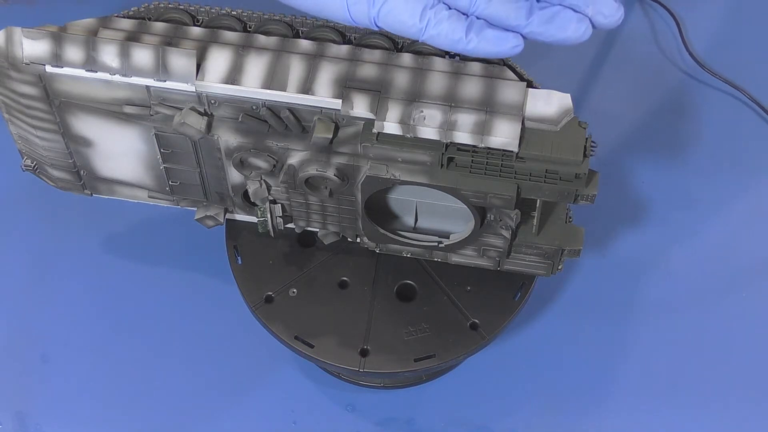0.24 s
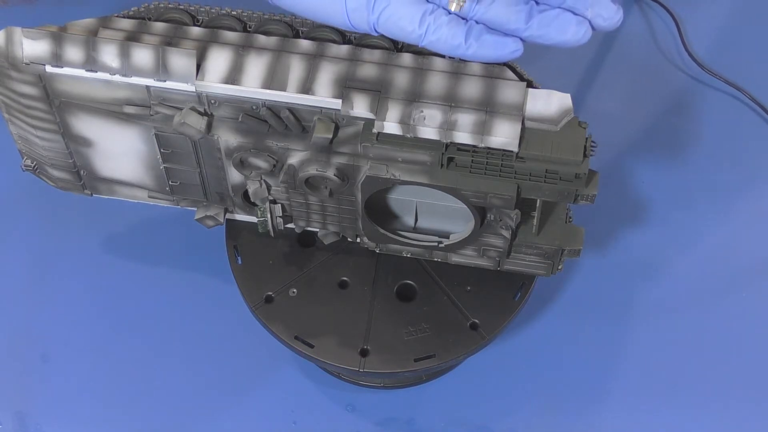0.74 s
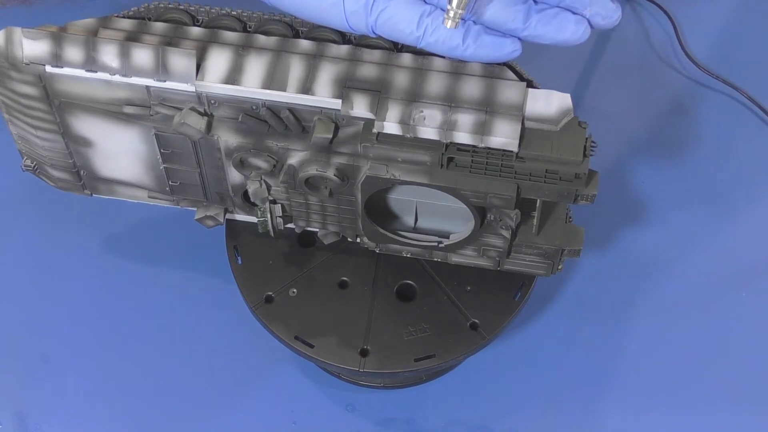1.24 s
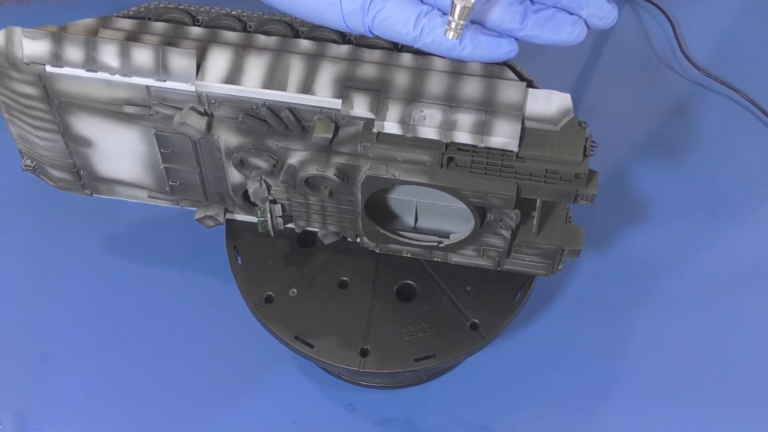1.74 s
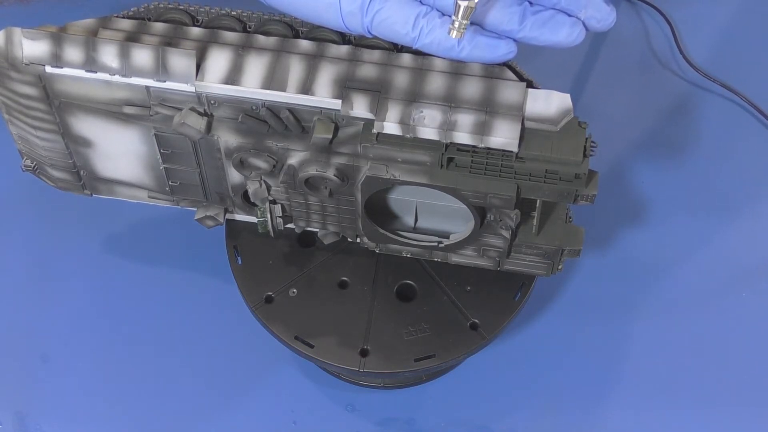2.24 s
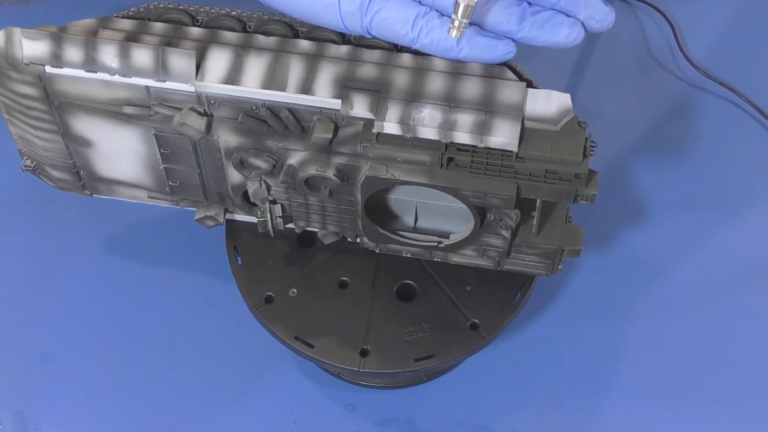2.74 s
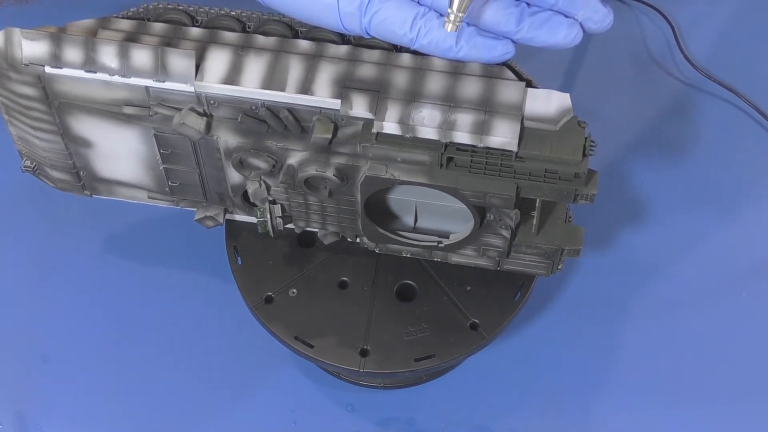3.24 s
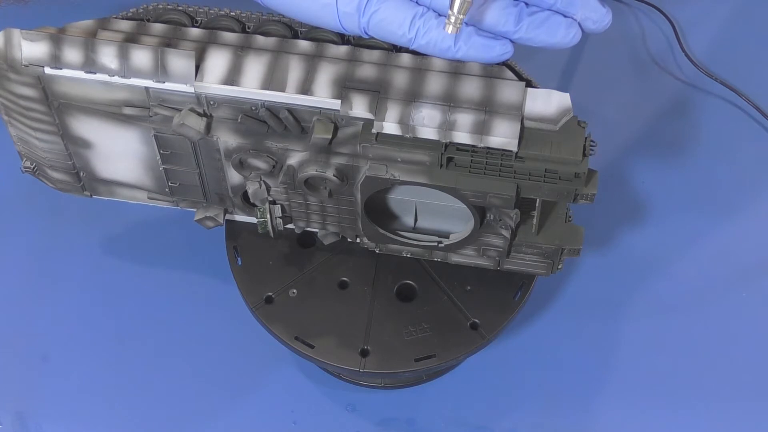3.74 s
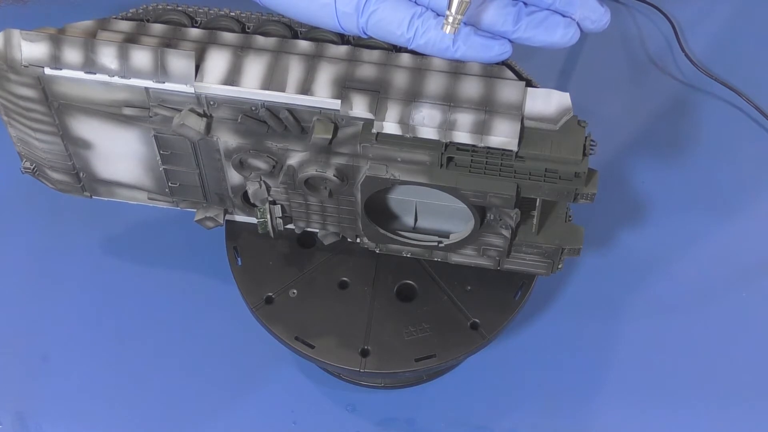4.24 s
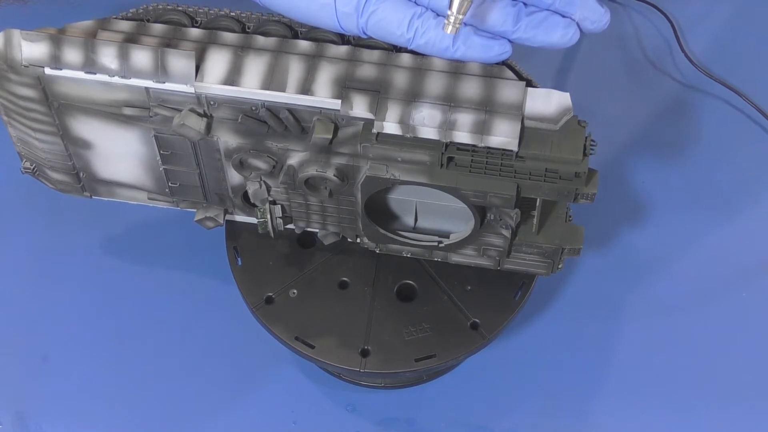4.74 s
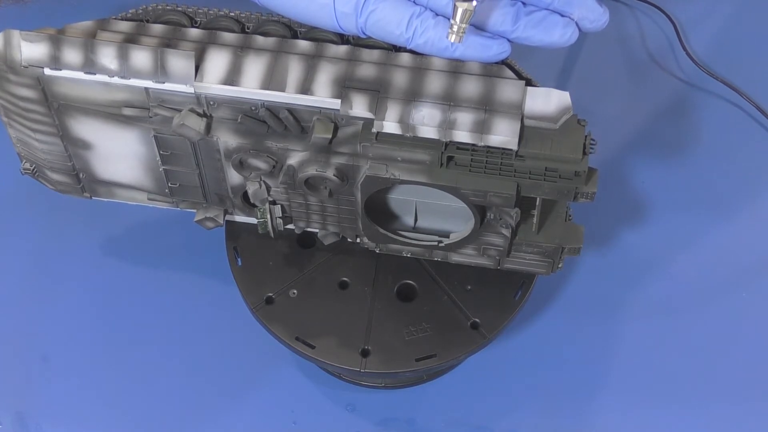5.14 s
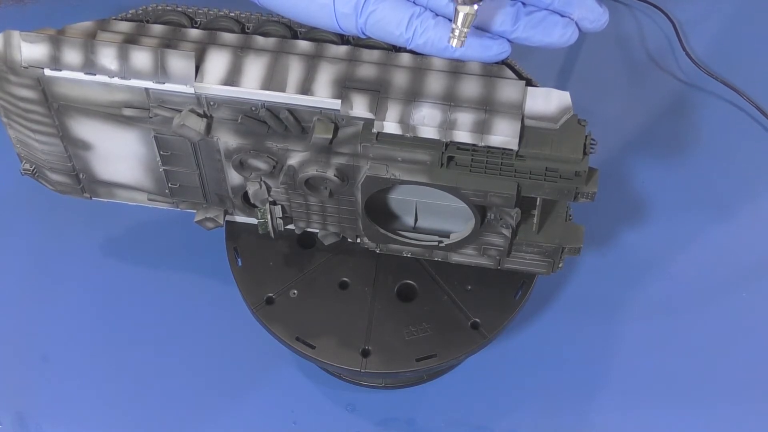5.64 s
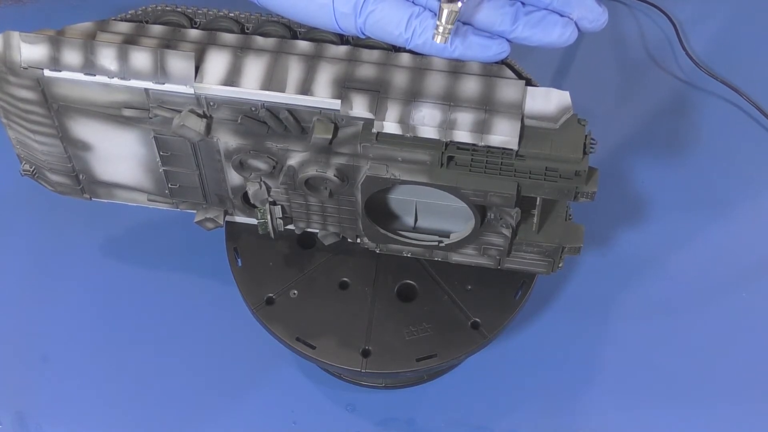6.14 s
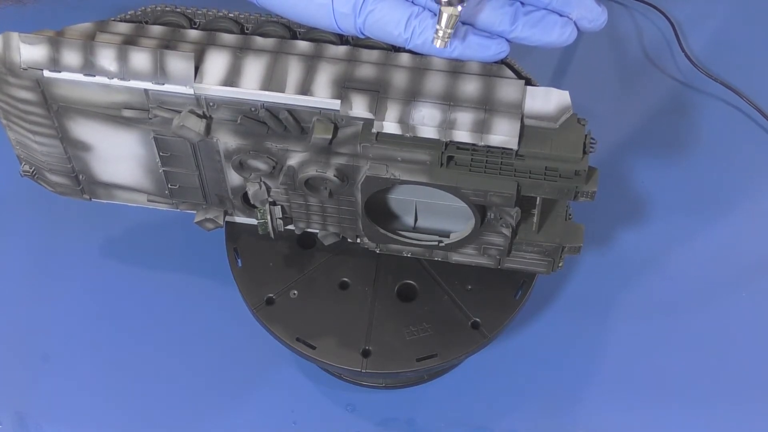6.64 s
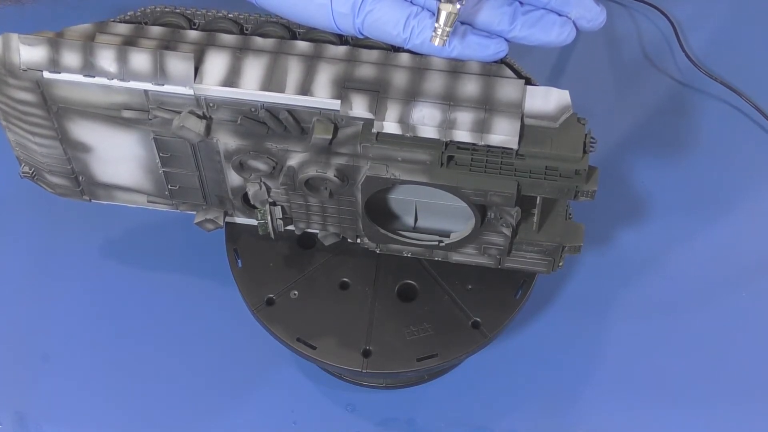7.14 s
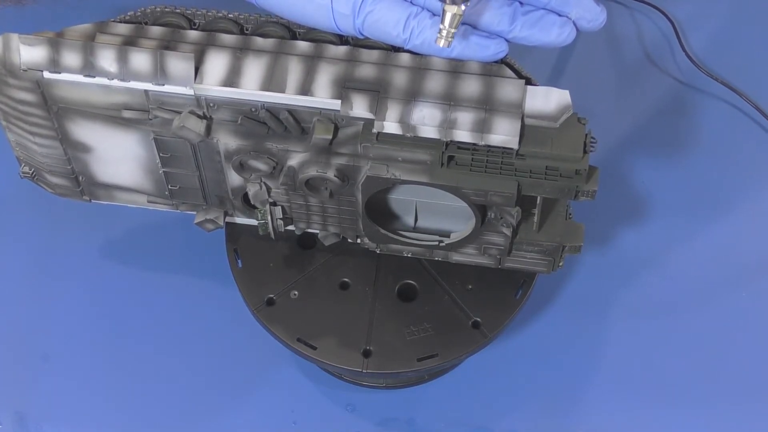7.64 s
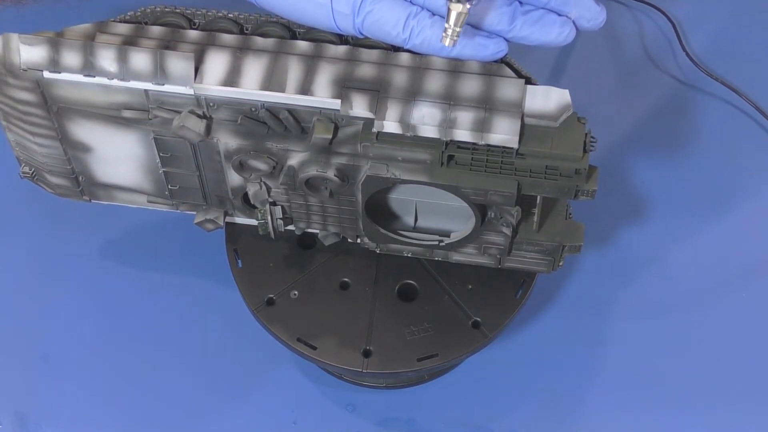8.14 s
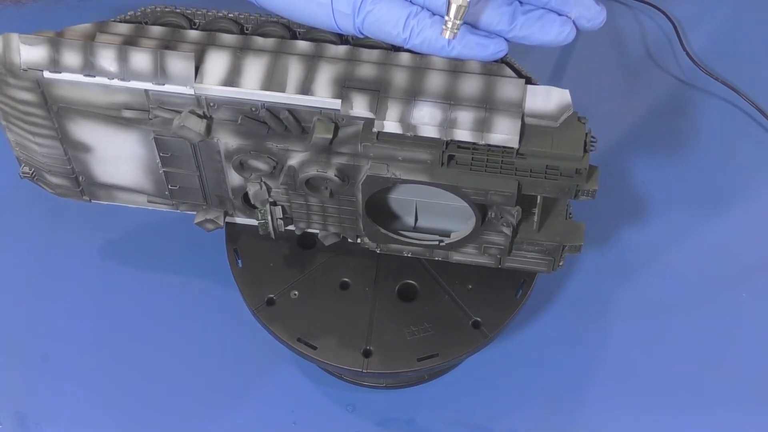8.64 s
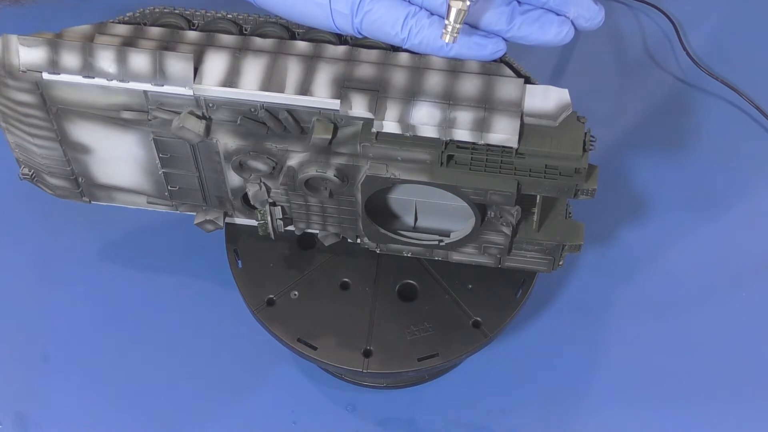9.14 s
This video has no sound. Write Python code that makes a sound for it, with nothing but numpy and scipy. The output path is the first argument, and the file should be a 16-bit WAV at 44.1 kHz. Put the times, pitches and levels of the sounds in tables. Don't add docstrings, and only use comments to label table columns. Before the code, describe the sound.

Close, dry mono sound of an airbrush spraying a hollow plastic model at a workbench. One long burst comes first, then fifteen short, regular puffs, mostly sharper and brighter than the first. Each shrieks briefly at high pitch, thins into a breathy jet and cuts off. Tiny clicks mark the trigger returning. A short room reflection, faint steady hum, hiss and a few soft bumps lie beneath.

```python
import sys
import numpy as np
from scipy import signal
from scipy.fft import rfft, irfft, next_fast_len
from scipy.io import wavfile
from scipy.ndimage import uniform_filter1d, map_coordinates

SR = 44100
rng = np.random.default_rng(int(sys.argv[2]) if len(sys.argv) > 2 else 0)


def ratio_of_db(decibels):
    return 10 ** (np.asarray(decibels, float) / 20)


def materialize(psi):
    bounded = np.clip(np.atleast_2d(psi).T, -1, 1)
    quanta = np.round(bounded * 32767).astype(np.int16)
    wavfile.write(sys.argv[1], SR, quanta)


N = 414035


def along(points, hz):
    point_hz, value = np.transpose(points)
    return np.interp(np.log(hz + 1), np.log(point_hz + 1), value)


def wobble(rate_hz):
    knots = rng.standard_normal(int(N * rate_hz / SR) + 4)
    return map_coordinates(knots, [np.arange(N) * rate_hz / SR])


def filtered(x, response):
    size = next_fast_len(N + 8192)
    gain = response(np.fft.rfftfreq(size, 1 / SR))
    return irfft(rfft(x, size) * gain, size)[..., :N]


def air(spectrum, modes, modes_db, patchy_db):
    z = signal.stft(rng.standard_normal(N), nperseg=512)[2]
    patches = uniform_filter1d(rng.standard_normal(z.shape), 6, 0)
    patches = uniform_filter1d(patches, 8, 1)
    noise = signal.istft(z * ratio_of_db(patchy_db * patches / patches.std()), nperseg=512)[1]

    def colour(f):
        power = ratio_of_db(2 * along(spectrum, f))
        for hz, width_hz, level_db in modes:
            power = power + ratio_of_db(2 * (level_db + modes_db)) / (1 + (2 * (f - hz) / width_hz) ** 2)
        return np.sqrt(power)

    out = filtered(noise, colour)
    return out / out.std()


# time_s, level_db
HUM_SWELL = [(0, -50.5), (1.5, -50), (3, -52), (4.2, -55), (5.2, -63), (6.3, -62.5), (7.2, -55),
             (8.5, -52.5), (9.4, -50)]
# freq_hz, density_db
ROOM_COLOUR = [(9, -25), (18, -1.5), (85, -7), (150, -12), (300, -14.5), (600, -17.5), (1210, -22.5),
               (1310, -29), (1800, -30), (3000, -34.5), (8000, -37), (15600, -42.5)]
# freq_hz, width_hz, level_db
DUCT_DRONES = [(337, 40, -18), (690, 50, -19.5), (1040, 22, -19.5), (1150, 28, -25), (1210, 25, -25.5)]


def workshop():
    t = np.arange(N) / SR
    hum_db = np.interp(t, *np.transpose(HUM_SWELL)) + 0.3 * wobble(2)
    hum = np.sqrt(2) * ratio_of_db(hum_db) * np.sin(2 * np.pi * 120.35 * t)
    rumble = air([(6, -20), (16, 3.5), (32, -3.5), (60, -35.5)], [], modes_db=0, patchy_db=0.0)
    draught = ratio_of_db(-56 + 3.5 * wobble(5)) * rumble
    return hum + draught + ratio_of_db(-50.1) * air(ROOM_COLOUR, DUCT_DRONES, modes_db=0.0, patchy_db=0.15)


# start_s, level_db, pitch_hz, rise_s, t60_s
BENCH_BUMPS = [
    (.085, -52, 1550, .006, .1),
    (.085, -50, 1280, .006, .1),
    (.46, -42.5, 227, 0.028, 0.39),
    (4.95, -50, 189, 0.0196, .3),
    (8.55, -41.5, 235, 0.015, .4),
]


def bumps():
    t = np.arange(N) / SR
    out = np.zeros(N)
    for start_s, level_db, pitch_hz, rise_s, t60_s in BENCH_BUMPS:
        age = np.clip(t - start_s, 0, None)
        swell = 1 - np.exp(-age / rise_s)
        out += ratio_of_db(level_db - 60 * age / t60_s) * swell * np.sin(2 * np.pi * pitch_hz * age)
    return out


# start_s, length_s, level_db, rise_db_per_s, top_over_nozzle_db
SEEPING = (.592, .135, -63, 75, 3.5)


def seep():
    start_s, length_s, level_db, rise_db_per_s, top_db = SEEPING
    age = np.arange(N) / SR - start_s
    gate = np.clip(age / 0.02, 0, 1) * (age < length_s)
    return gate * ratio_of_db(level_db + rise_db_per_s * age.clip(0, 1)) * ratio_of_db([[0], [top_db]])


OPENING_POWER, SHUT_T60_S = 2.68, 0.029


def valve(age, held_s, opening_s):
    opened = np.clip(age / opening_s, 0, 1) ** OPENING_POWER
    return opened * ratio_of_db(-60 * np.clip(age - held_s, 0, 1) / SHUT_T60_S)


SWELL_DB_PER_S, SAG_DB_PER_S = 59.5, 13.5


def throttle(age, peak_s, hold_s, fade_db_per_s, sag_db_per_s):
    swell_db = -SWELL_DB_PER_S * np.clip(peak_s - age, 0, 1)
    sag_db = -sag_db_per_s * np.clip(age - peak_s, 0, hold_s)
    fade_db = -fade_db_per_s * np.clip(age - peak_s - hold_s, 0, 1)
    return swell_db + sag_db + fade_db


# start_s, held_s, opening_s, jet_at_release_db, build_up_db
TRIGGER_PRESSES = [(.652, .763, .125, -30, 1.5), (1.6296, .421, .022, -30, .4),
                   (2.2814, .338, .02, -30.5, 3.5), (2.872, 0.35, .024, -29.9, 1),
                   (3.4396, .306, .027, -30.5, 1.8), (3.99, 0.31, .023, -29.8, 2.5),
                   (4.5626, 0.3, .02, -30.5, 2.9), (5.0536, 0.25, .017, -32.1, .1),
                   (5.5373, 0.27, .021, -27.2, 8), (6.0777, .289, .027, -31.4, 0.8),
                   (6.5801, 0.24, .014, -31, 0.8), (7.0743, .251, 0.02, -27, 7),
                   (7.5697, 0.29, 0.02, -28.5, 4.9), (8.0958, 0.2, .016, -28.5, 5),
                   (8.6058, .23, .015, -30.5, 0.3), (9.1462, 0.19, .018, -29.5, 2.5)]
# peak_after_start_s, hold_s, peak_db, fade_db_per_s, cap_rasp_db
PRESS_SHRIEKS = [(.287, 0.14, -25, 86, -29.1), (0.029, 0.082, -29.5, 56, -30.3),
                 (.11, .072, -17.3, 159, -25.5), (0.034, 0.098, -18.5, 241, -25),
                 (0.059, .099, -18, 600, -26.5), (0.051, 0.05, -17, 227, -24.6),
                 (0.029, .059, -17.5, 293, -25), (0.026, 0.076, -17.3, 292, -25.2),
                 (0.034, 0.0069, -16, 150, -23), (0.052, 0.071, -18, 141, -25.5),
                 (0.034, .029, -16.5, 134, -25), (0.031, .004, -15.4, 215, -24.2),
                 (0.038, 0.018, -16, 210, -23.5), (.03, .01, -16.5, 225, -24.5),
                 (.025, .053, -17, 519, -24.9), (0.027, 0.015, -16, 412, -24.3)]
# lag_s, extra_sag_db_per_s, fade_factor, fully_open_db
CAP_BAND = (0.02, -6.6, 0.9, -47)
NOZZLE_BAND = (0.01, 0.5, 1.07, -40)
TOP_BAND = (.004, 17.5, 1.1, -36.5)
TYPICAL_DB = -17
THROTTLED_DB = -2
TOP_DB, TOP_GROWTH = -24.5, 0.75


def presses():
    gains = np.zeros((4, N))
    for press, shriek in zip(TRIGGER_PRESSES, PRESS_SHRIEKS):
        start_s, held_s, opening_s, jet_db, build_db = press
        peak_s, hold_s, peak_db, fade, cap_db = shriek
        stop = min(N, int((start_s + held_s) * SR) + SR // 20)
        span = np.arange(int(start_s * SR), stop)
        age = span / SR - start_s

        def band(band_db, lag_s, extra_sag, fade_factor, open_db):
            shape_db = throttle(age, peak_s + lag_s, hold_s, fade * fade_factor, SAG_DB_PER_S + extra_sag)
            return np.hypot(ratio_of_db(band_db + shape_db), ratio_of_db(open_db))

        throttled = ratio_of_db(peak_db - TYPICAL_DB + throttle(age, peak_s, hold_s, fade, SAG_DB_PER_S))
        wash = ratio_of_db(jet_db + THROTTLED_DB * throttled + build_db * (age / held_s - 1))
        top_db = TOP_DB + TOP_GROWTH * (peak_db - TYPICAL_DB)
        bands = [wash, band(cap_db, *CAP_BAND), band(peak_db, *NOZZLE_BAND), band(top_db, *TOP_BAND)]
        gains[:, span] = valve(age, held_s, opening_s) * np.array(bands)
    return gains


# freq_hz, density_db
SHRIEK_COLOUR = [(880, -43.5), (1500, -18), (2300, -12), (3220, -11.5), (3550, -12.5), (4630, -13),
                 (5200, -18), (6200, -13.5), (6800, -11.5), (7930, -1.5), (9460, -14), (12200, -15),
                 (13200, -19), (15600, -24)]
JET_COLOUR = [(120, -48.5), (200, -28), (422, -8.5), (608, -5), (716, 0), (876, -6.5), (1150, -4.5),
              (2390, -16.5), (3900, -18.5), (5320, -17), (7950, -5), (10300, -15), (12300, -12.5),
              (15600, -19)]
# freq_hz, width_hz, level_db
NOZZLE_MODES = [(6170, 220, -6), (6340, 200, -8.5), (7350, 170, -3.5), (7840, 300, -5), (8120, 180, -1.5),
                (9080, 200, -8), (9950, 180, -5), (11280, 300, -5.5), (12000, 350, -6.5), (12600, 130, -15),
                (14050, 250, -19.5), (15250, 250, -22)]
CAP_MODES = [(2660, 90, -2), (3236, 160, 3.5), (4680, 310, -3.5), (5630, 150, -8)]
MODEL_HOLLOWS = [(463, 64, -2), (712, 56, 0), (980, 68, -8), (1087, 40, -1.5), (1340, 27, -10),
                 (1840, 154, -3), (2130, 92, -9.5), (3200, 200, -19), (3920, 220, -6.5), (6280, 250, -9),
                 (7520, 370, -10.5), (8790, 200, -3.5), (12000, 300, -14)]


def airbrush():
    wash, cap, *upper = presses()
    nozzle, top = np.hypot(upper, seep())
    flutter = ratio_of_db(0.66 * wobble(180) + 0.27 * wobble(30))
    jet = ratio_of_db(4.0 + 0.6 * wobble(14)) * wash * air(JET_COLOUR, MODEL_HOLLOWS, modes_db=-3.5, patchy_db=0.93)
    low = [p for p in SHRIEK_COLOUR if p[0] < 5600] + [(7000, -60)]
    middle = [(4500, -60)] + [p for p in SHRIEK_COLOUR if 4800 < p[0] < 10500] + [(12000, -60)]
    high = [(9000, -60)] + [p for p in SHRIEK_COLOUR if p[0] > 9300]
    rasp = cap * air(low, CAP_MODES, modes_db=-7, patchy_db=0.97)
    shriek = nozzle * air(middle, NOZZLE_MODES[:6], modes_db=-3.5, patchy_db=1.26)
    sizzle = top * air(high, NOZZLE_MODES[6:], modes_db=-4.0, patchy_db=-1.0)
    return jet + flutter * (rasp + shriek + sizzle)


# freq_hz, width_hz, depth (0-1)
ECHO_DIPS = [(360, 61, 0.36), (851, 67, 0.5), (1610, 68, 0.32), (1965, 90, 0.44), (5400, 430, 0.23),
             (5800, 150, .4), (8700, 150, 0.6), (9530, 200, 0.2), (10580, 250, 0.2)]


def bench(x):
    def response(f):
        gain = np.ones_like(f)
        for hz, width_hz, depth in ECHO_DIPS:
            gain = gain * (1 - np.clip(depth, 0, 1) / (1 + (2 * (f - hz) / width_hz) ** 2))
        return gain

    return filtered(x, response)


# freq_hz, t60_s
WALL_DECAY = [(300, 0.24), (2000, 0.21), (8000, 0.18), (15000, 0.2)]


def walls(x, count=4):
    hz, t, z = signal.stft(rng.standard_normal((count, SR // 4)), SR, nperseg=256)
    decay = ratio_of_db(-60 * t / along(WALL_DECAY, hz)[:, None])
    tails = signal.istft(z * decay, SR, nperseg=256)[1]
    shares = np.array([wobble(3) for _ in range(count)])
    shares /= np.linalg.norm(shares, axis=0)
    wet = signal.oaconvolve(shares * x, tails / np.linalg.norm(tails[0]), axes=1).sum(axis=0)
    return np.pad(wet, (100, 0))[:N]


# start_s, peak_db
LEVER_TICKS = [(1.8462, -25), (2.59, -26), (5.7488, -26.5), (5.786, -22), (6.788, -23), (7.8315, -19),
               (8.2723, -23), (8.8014, -24), (9.3117, -25)]


def trigger():
    out = np.zeros(N + 2048)
    t = np.arange(600) / SR
    for start_s, peak_db in LEVER_TICKS:
        tick = 0.75 * rng.standard_normal(len(t))
        for hz, level_db in ((1150, -4), (2300, -4.0), (3300, -2.5), (4700, -4.5)):
            tick += np.sin(2 * np.pi * hz * t) * ratio_of_db(level_db + rng.normal(0, 2.9))
        out[round(start_s * SR):][:len(t)] += ratio_of_db(peak_db - 0.5 - 60 * t / 0.013) * tick
    return filtered(out[:N], lambda f: 1 / (1 + (900 / (f + 1)) ** 4) / (1 + (f / 7000) ** 4))


# start_s, level_db, t60_s
LEAK_WHISTLES = [
    (2.64, -71, .5),
    (3.78, -65.5, .4),
    (6.87, -62, .6),
    (8.33, -65, .8),
]


def leak(pitch_hz=8250):
    t = np.arange(N) / SR
    fade = np.zeros(N)
    for start_s, level_db, t60_s in LEAK_WHISTLES:
        fade += (t > start_s) * ratio_of_db(level_db - 60 * np.abs(t - start_s) / t60_s)
    return fade * np.sin(2 * np.pi * np.cumsum(pitch_hz + 25 * wobble(60)) / SR)


def scene():
    spray = airbrush() + trigger()
    near = ratio_of_db(-0.33) * bench(spray)
    room = ratio_of_db(-8.5) * walls(spray)
    return np.tile(near + room + leak() + bumps() + workshop(), (2, 1))


def roll_off(x):
    return signal.sosfilt(signal.butter(12, 16450, fs=SR, output="sos"), x)


TOP_HZ = 15730


def record(dry):
    def edge(f):
        return np.sin(np.pi / 2 * np.clip((TOP_HZ + 110 - f) / 220, 0, 1)) ** 2

    mix = filtered(dry, edge)
    return roll_off(mix)


dry = scene()
out = record(dry)
materialize(out)
```